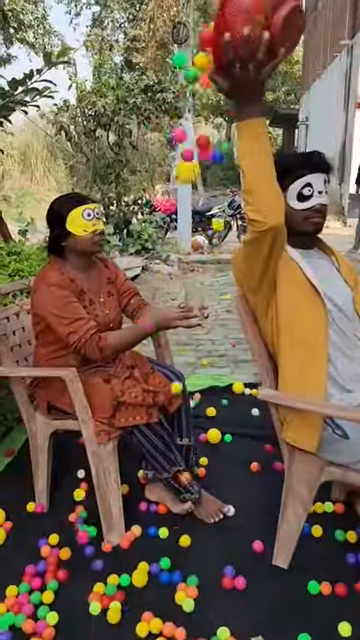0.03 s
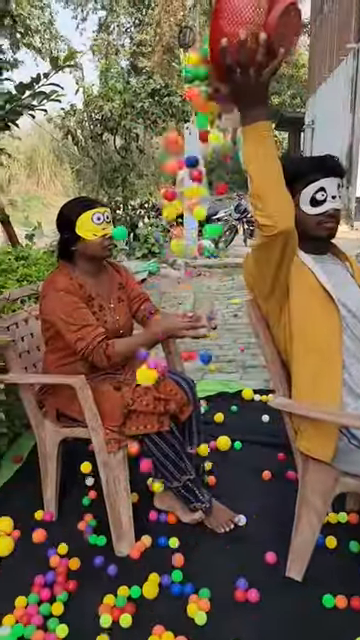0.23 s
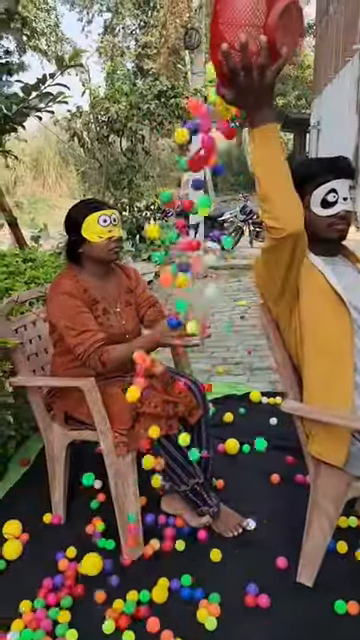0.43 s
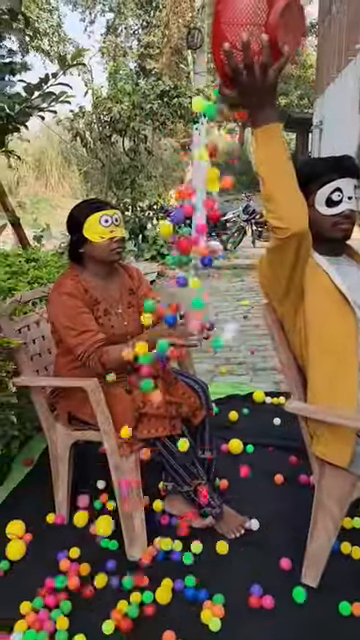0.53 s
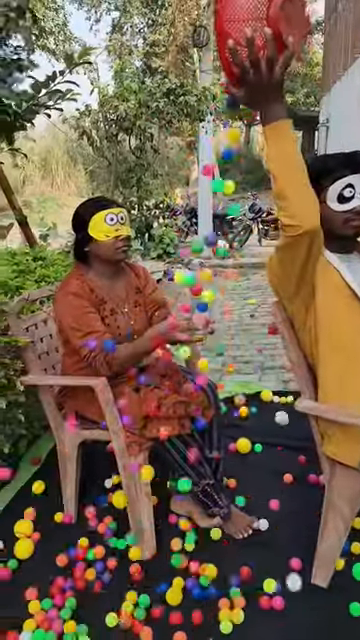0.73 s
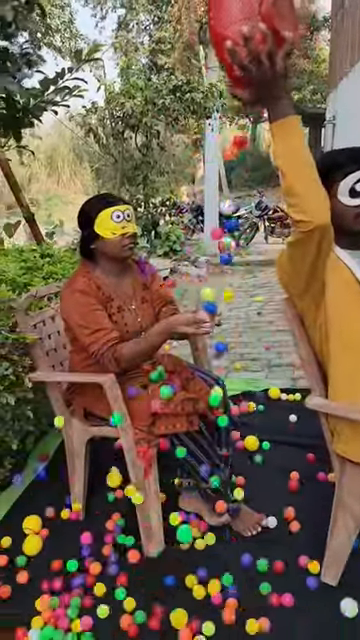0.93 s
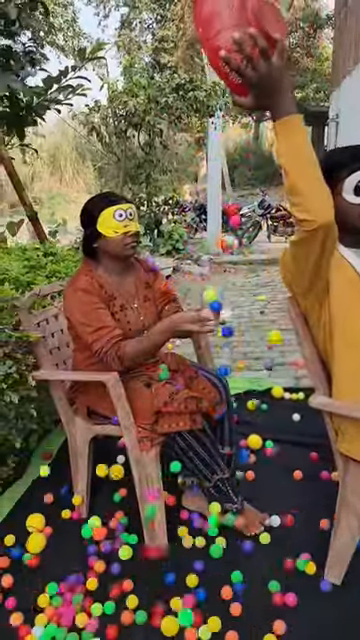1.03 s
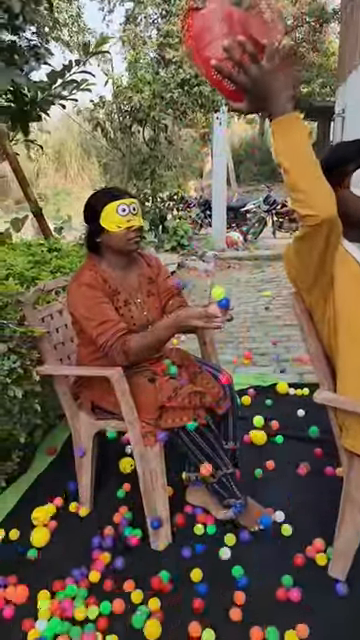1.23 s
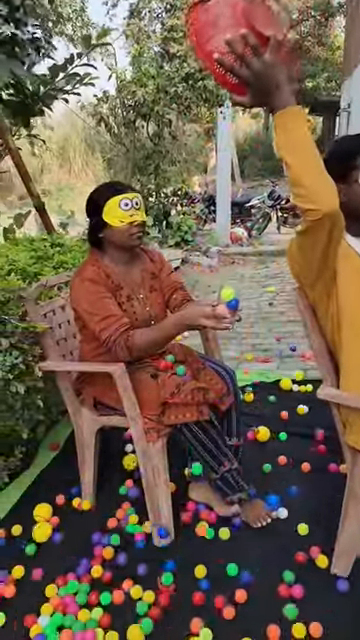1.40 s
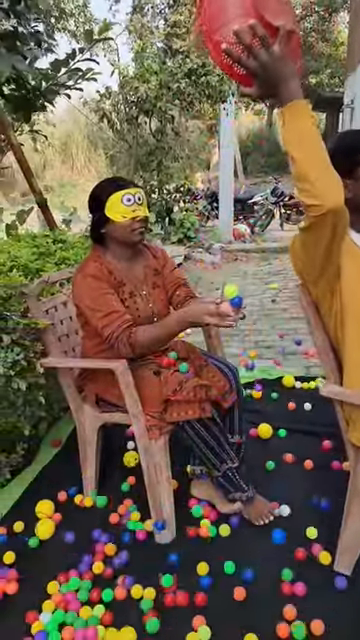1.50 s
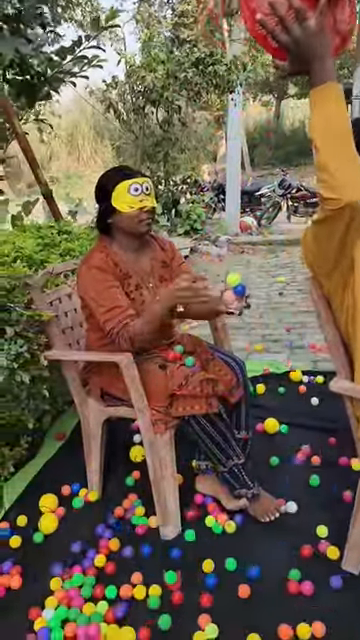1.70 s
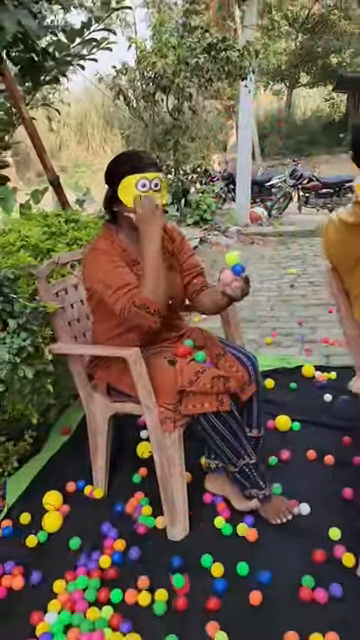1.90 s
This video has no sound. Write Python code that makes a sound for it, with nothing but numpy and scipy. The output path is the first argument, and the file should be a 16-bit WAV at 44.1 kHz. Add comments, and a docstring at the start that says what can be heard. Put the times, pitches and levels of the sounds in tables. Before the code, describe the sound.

Light plastic balls pour down and clatter close by on each other, a chair and a ground sheet. Some knock hollowly on a cup or thump softly on a lap, then the bouncing thins over a low outdoor rumble.

```python
"""Plastic balls tipped from a basket

Light hollow balls fall from overhead, outdoors. Some strike a hand-held cup: its air gives a
hollow pock, its wall rings faintly. Clumps thump on hands and lap. The rest clack on each other,
a plastic chair and a ground sheet, then bounce and scatter over a low outdoor rumble."""
import sys
import numpy as np
from scipy import signal
from scipy.fft import rfft, irfft
from scipy.io import wavfile

SR = 44100
rng = np.random.default_rng(int(sys.argv[2]) if len(sys.argv) > 2 else 0)


def dump(signal):
    """Clip the signal to [-1, 1] and save it as 16-bit WAV at the path in sys.argv[1]."""
    limited = np.clip(np.atleast_2d(signal).T, -1, 1)
    pcm = np.round(limited * 32767).astype(np.int16)
    wavfile.write(sys.argv[1], SR, pcm)


N = 85995
LEFT_LAG_S = 0.00016


def amp(db):
    """Decibels to gain."""
    return 10 ** (np.asarray(db) / 20)


def unit_rms(x):
    """Scale to rms 1."""
    return x / np.sqrt(np.mean(x ** 2) + 1e-20)


def gain_at(points, hz):
    """Gain from (f/Hz, level/dB) points, interpolated over log frequency."""
    f, db = np.transpose(points)
    return amp(np.interp(np.log(hz + 1), np.log(f + 1), db))


def add(mix, start_s, sound):
    """Mix in a stereo sound."""
    part = mix[:, max(round(start_s * SR), 0):][:, :sound.shape[1]]
    part += sound[:, :part.shape[1]]


def resonate(x, hz, width_hz):
    """Broad resonance, applied twice for steep skirts."""
    b, a = signal.iirpeak(min(hz, SR / 2 - 1), hz / width_hz, SR)
    return signal.lfilter(b, a, signal.lfilter(b, a, x))


def colour(x, points, size=2048):
    """Minimum-phase filter with the given spectrum."""
    log_gain = np.log(gain_at(points, abs(np.fft.fftfreq(size, 1 / SR))))
    taps = np.fft.ifft(np.exp(np.conj(signal.hilbert(log_gain)))).real
    return signal.oaconvolve(x, taps[:size // 2])[:N]


def outdoor_air(level_db=-46, mono_hz=990):
    """Steady rumble and hiss, nearly mono in the bass."""
    # background spectrum: f/Hz, relative density/dB
    spectrum = [(20, -5.5), (66, 4.5), (95, 0), (300, -9.5), (1500, -16), (6300, -16.5), (9500, -64),
                (15000, -48)]
    hz = np.fft.rfftfreq(N, 1 / SR)
    left, spare = rfft(rng.standard_normal((2, N)))
    coherence = .96 / (1 + (hz / mono_hz) ** 2)
    right = coherence * left + np.sqrt(1 - coherence ** 2) * spare
    return amp(level_db) * unit_rms(irfft(np.array([left, right]) * gain_at(spectrum, hz), N))


def ball_strike(shell_hz, body_db, body_hz):
    """A crack into the thin shell: brief note, hollow body, faint thud, bright tick."""
    contact_s, crack_s, ring_s = .00042, .0009, .005
    note_width_hz, hollow_width_hz = 1540, 230
    coherence, lag_spread_s = .98, .00007
    t = np.arange(1024) / SR

    def equal_energy(x):
        return x / np.sqrt((x ** 2).sum() / (2 * (SR // 260)))

    envelope = (1 - np.exp(-t / contact_s)) * (np.exp(-t / crack_s) + amp(-13) * np.exp(-t / ring_s))
    right, spare = rng.standard_normal((2, len(t))) * envelope
    crack = np.array([coherence * right + np.sqrt(1 - coherence ** 2) * spare, right])
    shell = resonate(crack, shell_hz, width_hz=2090)
    note = np.exp(-np.pi * note_width_hz * t) * np.sin(2 * np.pi * shell_hz * np.array([t, t]))
    knock = resonate(crack, body_hz, width_hz=1470)
    hollow = np.exp(-np.pi * hollow_width_hz * t) * np.sin(2 * np.pi * body_hz * t)
    body = unit_rms(knock) + amp(-1) * unit_rms(hollow)
    thud = resonate(np.array([right, right]), hz=540, width_hz=5400)
    tick = np.diff(crack, prepend=0)
    parts = [(0, shell), (-6.5, note), (body_db, body), (-9, thud), (-13, tick)]
    hit = sum(amp(db) * equal_energy(part) for db, part in parts)
    lag = max(round((LEFT_LAG_S + lag_spread_s * rng.standard_normal()) * SR), 0)
    hit[0] = np.pad(hit[0], (lag, 0))[:len(t)]
    return equal_energy(hit)


def bounces(count=900):
    """Many lesser hits of random strength and pitch, swelling and fading with the pour."""
    # pour envelope: t/s, level/dB
    pour = [(0, -32.5), (0.066, -48.5), (.11, -36.5), (.34, -34.5), (.44, -38), (.475, -25), (0.513, -36),
            (0.557, -23), (0.61, -21), (0.635, -33), (0.662, -17.5), (.77, -22.5), (.91, -29), (.99, -27.5),
            (1.05, -23.5), (1.235, -35), (1.285, -31.5), (1.335, -38.5), (1.732, -39.5), (1.8, -44),
            (1.95, -38)]
    out = np.zeros((2, N))
    times_s = (np.arange(count) + rng.uniform(-1, 1, count)) * N / SR / count
    deviates = np.clip(rng.standard_normal((count, 4)), -2, 1.5)
    for start_s, (strength, pitch, body, body_pitch) in zip(times_s, deviates):
        hit = ball_strike(shell_hz=5856 * np.exp(.22 * pitch), body_db=-6 + 3 * body,
                          body_hz=1600 * np.exp(.33 * body_pitch))
        add(out, start_s, amp(3.3 * strength) * hit)
    return unit_rms(out) * amp(np.interp(np.arange(N) / SR, *np.transpose(pour)))


def clacks():
    """Near, hard ball strikes."""
    # strikes: t/s, level/dB, shell f/Hz, body level/dB re shell, body f/Hz
    strikes = [(0.0893, -27, 5400, -1, 1380), (0.1056, -21, 4800, 6, 1450), (0.156, -32, 4700, 16, 1490),
               (0.235, -14.5, 6180, -12.5, 1580), (0.2504, -18.5, 4700, -16, 1090),
               (0.378, -17, 7600, -5.5, 1160), (0.4073, -19, 5500, -5, 2270), (0.424, -23, 5200, -11, 1560),
               (0.4502, -20, 5300, -13.5, 1620), (0.457, -14.5, 4600, -6.5, 1530),
               (0.4735, -20.5, 4950, 0, 2280), (0.4833, -15.5, 5500, 1.5, 810),
               (0.5319, -15.5, 5170, -11, 1590), (0.571, -17, 5150, 4, 990), (0.603, -22, 5800, 0, 2000),
               (0.6122, -14.5, 5640, -13, 940), (0.6577, -12.5, 6230, -8, 1650),
               (0.7047, -21, 4960, -13, 1580), (0.7305, -13.5, 5640, -7.5, 1600),
               (0.7485, -14, 5600, -16, 1610), (0.7738, -12, 8340, -18, 1100),
               (0.8085, -14.5, 6750, -12, 1210), (0.8512, -15, 5850, -6.5, 1620),
               (0.881, -18.5, 5400, -6, 780), (0.8924, -16, 5600, -2, 2060), (0.9295, -13.5, 5000, 3, 1640),
               (0.9339, -11, 6560, -11, 1620), (0.9796, -20.5, 5100, -5, 2860),
               (1.0099, -18, 5970, -23, 1090), (1.017, -18.5, 5400, -12, 1610),
               (1.0494, -15.5, 6500, -5.5, 1720), (1.0628, -23, 5040, 0, 1110),
               (1.0748, -12, 5400, -22, 1640), (1.1, -21, 4800, -7, 1450), (1.1363, -20, 7300, -0.5, 1590),
               (1.1897, -17, 6950, -15, 1570), (1.2043, -21, 4670, -7.5, 1570),
               (1.2542, -19.5, 5870, -11.5, 840), (1.2702, -19.5, 5900, -7.5, 3450),
               (1.3032, -19, 5100, -4, 2540), (1.347, -26, 5130, -2, 3050), (1.3808, -24.5, 5000, -3, 2860),
               (1.3945, -24.5, 6300, -4, 830), (1.416, -23, 5140, -6.5, 860),
               (1.4403, -20.5, 6860, -2, 1860), (1.4747, -15.5, 6800, -7, 1620),
               (1.516, -28, 7230, 4, 2370), (1.5357, -31.5, 4330, -6, 1510), (1.5485, -26, 4970, 2, 1330),
               (1.586, -23.5, 5800, 1, 1400), (1.6223, -24, 5700, -6.5, 1080),
               (1.6759, -33, 6000, -3, 3300), (1.6924, -22, 6900, -2.5, 1930),
               (1.7199, -24.5, 7060, -10.5, 1580), (1.825, -21.5, 5300, -24, 1380),
               (1.861, -29.5, 7100, 2, 1640)]
    out = np.zeros((2, N))
    for start_s, db, shell_hz, body_db, body_hz in strikes:
        add(out, start_s, amp(db) * ball_strike(shell_hz, body_db, body_hz))
    return out


def cup_wall():
    """The struck wall rings faintly in three modes, louder on the right."""
    # wall strikes: t/s, level/dB
    hits = [(0.2485, -35), (0.536, -33), (0.657, -29.5), (0.75, -28), (0.9777, -38)]
    # wall modes: f/Hz
    modes_hz = [1111, 2795, 5142]
    # ring per mode: relative level/dB, T60/s
    rings = [(4.5, 0.18), (9.5, 0.16), (3.5, 0.14)]
    out = np.zeros((2, N))
    t = np.maximum(np.arange(SR // 4) / SR - np.array([[LEFT_LAG_S], [0]]), 0)
    for start_s, db in hits:
        wall = sum(amp(mode_db - 60 * t / t60_s) * np.sin(2 * np.pi * (hz * t + rng.random()))
                   for hz, (mode_db, t60_s) in zip(modes_hz, rings))
        add(out, start_s, amp(db) * wall * np.array([[.5], [1]]))
    return out


def cup_pocks(rise_s=.0047, decay_s=.011):
    """The air in the struck cup resonates, swelling and dying within a few cycles."""
    # cup strikes: t/s, level/dB, air f/Hz
    pocks = [(.2492, -15, 698), (.379, -27.5, 679), (.5325, -12.5, 664), (.594, -18.5, 690),
             (0.6521, -17.5, 667), (.665, -14.5, 682), (.679, -14, 665), (.713, -15, 690),
             (0.745, -14, 668), (.808, -23.5, 679), (.929, -19.5, 677), (.977, -21, 671)]
    out = np.zeros((2, N))
    t = np.maximum(np.arange(SR // 4) / SR - np.array([[LEFT_LAG_S], [0]]), 0)
    u = t / rise_s
    swell = u ** 2 * np.exp(2 * (1 - u))
    tail = (1 - np.exp(-u)) * np.exp(1 - t / decay_s)
    envelope = (swell + tail) / (swell + tail).max()
    for start_s, db, hz in pocks:
        add(out, start_s, amp(db) * envelope * np.sin(2 * np.pi * hz * t))
    return out


def thumps(centre_hz=510, width_hz=1020, rise_s=.012):
    """Clumps of balls land on hands and lap: padded, no ring."""
    # landings: t/s, level/dB
    landings = [(0.476, -34.5), (.598, -26.5), (0.775, -32), (1.199, -32.5)]
    out = np.zeros((2, N))
    u = np.arange(SR // 10) / SR / rise_s
    band = signal.iirpeak(centre_hz, centre_hz / width_hz, SR)
    for start_s, db in landings:
        noise = unit_rms(signal.lfilter(*band, rng.standard_normal(len(u))))
        add(out, start_s, amp(db) * np.array([noise, noise]) * u * np.exp(1 - u))
    return out


def yard_echo(x, level_db=-10, t60_s=.04, gap_s=.003):
    """Weak, short scatter from ground, chairs and walls."""
    t = np.arange(SR // 3) / SR
    sparse = rng.standard_normal((2, len(t))) * (rng.random((2, len(t))) < .06)
    taps = sparse * (t > gap_s) * amp(-60 * t / t60_s)
    taps /= np.linalg.norm(taps, axis=1, keepdims=True)
    return amp(level_db) * signal.fftconvolve(x, taps, axes=1)[:, :N]


def scene():
    """Balls and cup in the open yard."""
    # strike colour at each ear: f/Hz, gain/dB
    left_ear = [(100, -13.5), (600, 1.5), (1400, -3), (2300, -4), (5500, -12.5), (7400, -7.5), (10200, -6),
                (11600, 4.5), (15000, -1)]
    right_ear = [(100, -12.5), (600, 0), (1800, 0), (4000, 4), (6200, 0), (7400, -1.5), (8200, -13.5),
                 (10100, -9.5), (11500, 6.5), (15400, 1.5)]
    left, right = clacks() + bounces()
    balls = np.array([colour(left, left_ear), colour(right, right_ear)])
    direct = balls + cup_wall() + cup_pocks() + thumps()
    return direct + yard_echo(direct) + outdoor_air()


def record(dry, ceiling=.95, cutoff_hz=15900):
    """Soft-clip the highest peaks, then low-pass."""
    clipped = dry / (1 + (dry / ceiling) ** 6) ** (1 / 6)
    lowpass = signal.firwin(255, cutoff_hz, window=("kaiser", 9), fs=SR)
    return signal.oaconvolve(clipped, lowpass[None], "same")


dry = scene()
out = record(dry)
dump(out)
```